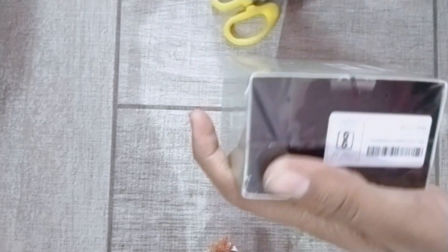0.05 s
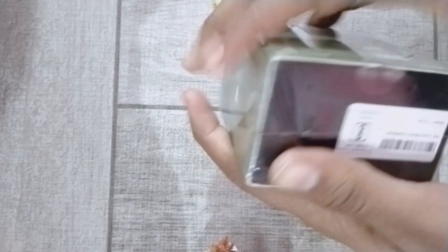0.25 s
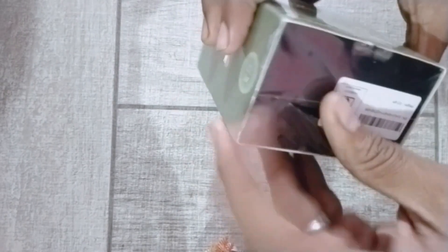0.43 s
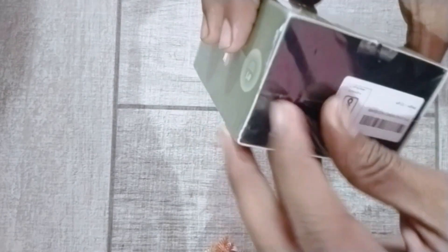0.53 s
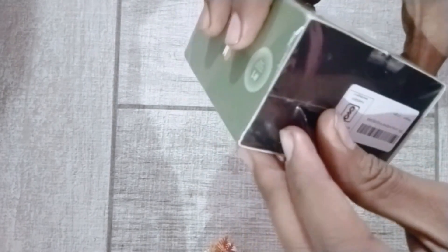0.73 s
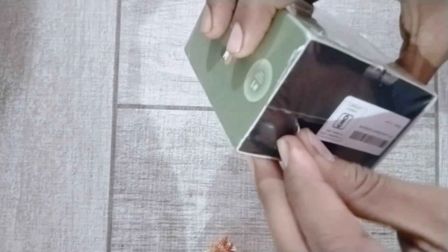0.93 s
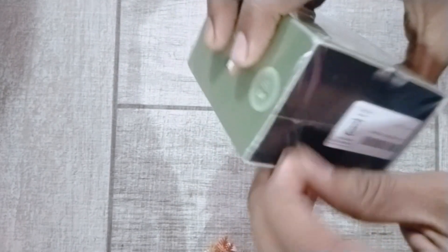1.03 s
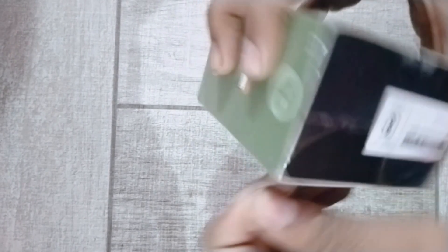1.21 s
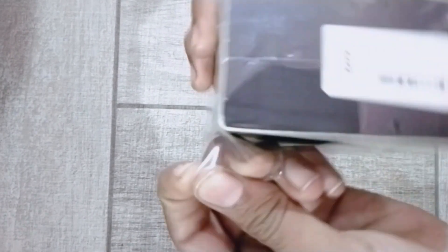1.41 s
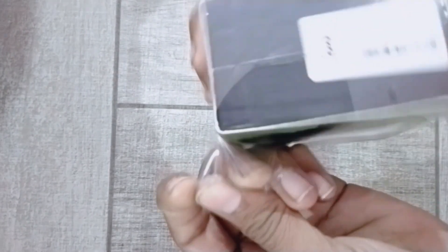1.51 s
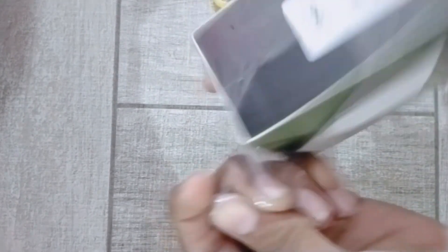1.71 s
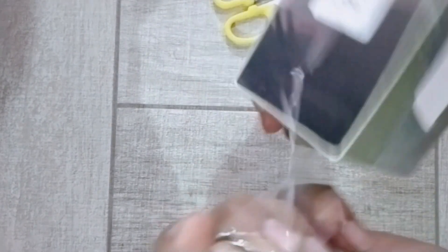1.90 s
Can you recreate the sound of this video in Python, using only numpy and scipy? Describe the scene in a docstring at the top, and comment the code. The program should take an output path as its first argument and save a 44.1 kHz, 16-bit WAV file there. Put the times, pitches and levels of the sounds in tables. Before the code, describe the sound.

Tight plastic wrap snaps and rips as hands work it off a small box, close up in a slightly echoing room. Faint rubbing and a sharp cardboard knock follow, then quiet crinkles and a last snap with a thud.

```python
"""In a hard-walled room, close to the microphone, hands tear shrink wrap off a small cardboard box.
The taut film releases its tension in a few loud snaps and a tear of many tiny slips. Palms and
fingertips rub by stick-slip friction, and two knocks excite the damped modes of the box.
The loosened film rustles and buckles in crinkles as it is pulled away, then snaps once more, with a
low thud from the box. Snaps, crinkles and knocks leave a short diffuse reverberation."""
import sys
import numpy as np
from scipy import signal
from scipy.fft import rfft, irfft, next_fast_len
from scipy.io import wavfile

SR = 44100
rng = np.random.default_rng(int(sys.argv[2]) if len(sys.argv) > 2 else 0)


def generate_wav(sig):
    """Save sig (samples, or channels by samples) to the path in sys.argv[1] as 16-bit PCM at SR."""
    pcm = np.round(np.clip(np.atleast_2d(sig).T, -1, 1) * 32767).astype(np.int16)
    wavfile.write(sys.argv[1], SR, pcm)


N = 85995

# resonances of the film stretched over the box: pitch_hz, bandwidth_hz, gain_db
FILM_RESONANCES = [(1350, 30, 4.5), (2140, 170, 6), (2820, 120, 3), (3490, 200, -2.5), (4380, 230, -7)]
# spectrum of slack film: frequency_hz, level_db
SLACK_SPECTRUM = [(60, -30.5), (250, -10.5), (900, -6.5), (1550, -12), (2200, -7.5), (3200, -7.5),
                  (4200, -4), (7000, -3), (11000, -4.5), (15500, -13)]


def amp(db):
    """Amplitude ratio of a level in decibels."""
    return 10 ** (np.asarray(db) / 20)


def unit(x):
    """Normalisation to rms 1."""
    return x / np.sqrt(np.mean(x ** 2) + 1e-20)


def along(points, hz):
    """Interpolation of (frequency_hz, value) points on a logarithmic frequency axis."""
    point_hz, values = np.transpose(points)
    return np.interp(np.log(hz + 1), np.log(point_hz + 1), values)


def envelope(points):
    """Amplitude envelope through (time_s, level_db) points."""
    return amp(np.interp(np.arange(N) / SR, *np.transpose(points)))


def sides(pan_db):
    """Level difference between the channels: left exceeds right by pan_db."""
    return amp(np.array([[pan_db], [-pan_db]]) / 2)


def add(out, start_s, sound):
    """Superposition of a sound on the mix from start_s on."""
    part = out[:, int(start_s * SR):][:, :sound.shape[1]]
    part += sound[:, :part.shape[1]]


def high_pass(x, hz, order):
    """Maximally flat attenuation of the band below hz."""
    return signal.sosfilt(signal.butter(order, hz, 'highpass', fs=SR, output='sos'), x)


def coloured(pair, spectrum, tilt_db=0):
    """Spectral shaping of a noise pair to rms 1; long waves reach both channels coherently."""
    # likeness of left and right: frequency_hz, correlation
    coherence = [(100, .92), (300, .8), (600, .3), (1000, 0), (10000, 0)]
    size = pair.shape[1]
    hz = np.fft.rfftfreq(size, 1 / SR)
    octaves = np.log2(np.maximum(hz, 300) / 4000)
    gain = amp(along(spectrum, hz) + tilt_db * octaves)
    angle = np.arccos(np.clip(along(coherence, hz), -1, 1)) / 2
    mid, side = irfft(rfft(pair) * gain * [np.cos(angle), np.sin(angle)], size)
    return unit(np.array([mid + side, mid - side]))


def resonate(x, peaks):
    """Forced response of parallel resonators driven by x."""
    return sum(amp(db) * signal.lfilter(*signal.iirpeak(hz, hz / width, SR), x)
               for hz, width, db in peaks)


def ring(modes, attack_s, lag_s=0, tilt_db=0):
    """Free vibration of damped modes, reaching the left channel lag_s late; tilt_db is per octave."""
    t = np.maximum(np.arange(4096) / SR - np.array([[lag_s], [0]]), 0)
    onset = (1 - np.exp(-t / attack_s)) ** 2
    vibration = np.zeros_like(t)
    for hz, db, t60 in modes:
        gain = amp(db + tilt_db * np.log2(hz / modes[1][0]))
        vibration += gain * np.cos(2 * np.pi * hz * t) * np.exp(-np.log(1000) * t / t60)
    return onset * vibration


def reverberate(x, wet_db, t60_scale=0.89):
    """Direct sound plus a diffuse field, in which absorption removes the treble first."""
    # reverberation time before scaling: frequency_hz, t60_s
    decay_times = [(120, 0.69), (500, 0.56), (1500, 0.51), (5000, 0.39), (13000, 0.26)]
    wall_delay_s, build_s = 0.0027, 0.0034
    hz, t, noise = signal.stft(rng.standard_normal((2, SR)), SR, nperseg=256)
    decay = amp(-60 * t / t60_scale / along(decay_times, hz)[:, None])
    tail = signal.istft(noise * decay, SR, nperseg=256)[1]
    since_reflection = np.maximum(np.arange(tail.shape[1]) / SR - wall_delay_s, 0)
    tail *= 1 - np.exp(-since_reflection / build_s)
    tail = coloured(tail, [(1, 0)]) / np.sqrt(tail.shape[1])
    return x + amp(wet_db) * signal.fftconvolve(x, tail, axes=1)[:, :N]


def background():
    """Ambient noise floor, over which faint pure tones swell and fade."""
    # faint tones: centre_s, half_length_s, pitch_hz, level_db
    faint_tones = [(.01, 0.041, 2070, -83), (0.108, 0.086, 655, -76.5), (0.514, 0.13, 452, -64),
                   (0.627, 0.049, 358.7, -67), (0.706, 0.017, 331.4, -64.5), (0.745, 0.049, 863, -72.5),
                   (1.159, 0.092, 136.3, -62.5), (1.102, 0.062, 864, -74.5)]
    # spectrum of the quiet room: frequency_hz, level_db
    floor_spectrum = [(25, -12), (150, -1), (600, -6.5), (2000, -12), (5000, -22.5), (15000, -30.5)]
    t = np.arange(N) / SR
    tones = np.zeros(N)
    for centre_s, half_s, hz, db in faint_tones:
        swell = amp(db) * np.exp(-((t - centre_s) / half_s) ** 2)
        tones += swell * np.sqrt(2) * np.sin(2 * np.pi * (hz * t + rng.random()))
    return tones + amp(-78) * coloured(rng.standard_normal((2, N)), floor_spectrum)


def stick_slip(slips_per_s, scatter_db, hiss):
    """Friction as shot noise: tiny slips of random time and size over a smooth hiss."""
    occurs = rng.random(N) < slips_per_s / SR
    slips = occurs * amp(scatter_db * np.clip(rng.standard_normal(N), -2, 2))
    slip_decay = np.exp(-np.arange(256) / (.0005 * SR))
    power = np.convolve(slips ** 2, slip_decay)[:N]
    return rng.standard_normal((2, N)) * np.sqrt(power / power.mean() + hiss ** 2)


def cracks(events, spectrum):
    """Impulsive excitation: each facet of film that flips gives a noise burst and rings at its pitch."""
    attack_s, facet_q, facet_db = .0004, 4.2, 1.5
    out, t = np.zeros((2, N)), np.arange(4096) / SR
    for start_s, db, decay_s, tilt_db, pan_db, hz in events:
        shape = (1 - np.exp(-t / attack_s)) * np.exp(-t / decay_s)
        burst = coloured(rng.standard_normal((2, len(t))), spectrum, tilt_db)
        burst = unit(burst + resonate(burst, [(hz, hz / facet_q, facet_db)]))
        add(out, start_s, amp(db) * sides(pan_db) * shape / shape.max() * burst)
    return out


def taut_film():
    """A membrane under tension twangs, fractures in snaps and a running tear, and ticks on the box edge."""
    # tear running through the film: time_s, level_db
    tear_levels = [(.115, -100), (.128, -59), (.17, -62.5), (.205, -40), (.222, -31.5), (.25, -56),
                   (.32, -36.5), (.36, -59), (.43, -58), (.55, -100), (1.89, -100), (1.915, -46.5),
                   (1.95, -47.5)]
    # spectrum of the tear: frequency_hz, level_db
    tear_spectrum = [(60, -25.5), (250, -6.5), (700, 0.5), (1300, 1), (2300, -0.5), (4500, -0.5),
                     (7000, -5.5), (11000, -12.5), (15500, -20)]
    # film giving way: start_s, level_db, decay_s, tilt_db_per_octave, pan_db, pitch_hz
    snaps = [(.1238, -46, 0.0064, -2.5, -2, 5470), (.1964, -34.5, 0.0043, -1, 5, 4300),
             (.2079, -19.5, 0.0086, 5.5, -2, 6500), (.2118, -12.5, 0.0048, -0.33, -1.5, 2760),
             (.2694, -23, 0.0065, -0.24, -1.5, 5500), (.3052, -33, 0.0043, -2, 2, 4150),
             (1.9102, -37.5, 0.0026, 1.5, -9.5, 9000), (1.9355, -34, 0.00095, -2, -4.5, 4940)]
    # spectrum of taut film: frequency_hz, level_db
    snap_spectrum = [(30, -22.5), (100, -20.5), (250, 3.5), (600, -6.5), (1000, 1.5), (3000, -2.5),
                     (4500, -3), (7000, -3.5), (11000, -4), (15500, -18)]
    # modes of the film as it is first pulled tight: pitch_hz, level_db, t60_s
    twang_modes = [(904, -2.5, 0.23), (2100, 6.5, 0.043), (2434, -0.5, .07), (3080, -3, .13)]
    # film catching on the box edge: start_s, level_db, pitch_hz
    ticks = [(1.377, -47.5, 2000), (1.4078, -45.5, 2070), (1.56, -45.5, 2115), (1.7741, -52, 1505),
             (1.7965, -39, 1790), (1.8398, -46.5, 1795), (1.9096, -28.5, 3240)]
    # modes of the film over that edge: pitch_hz, level_db, t60_s
    edge_modes = [(1293, -4, 0.025), (2197, 1.5, 0.018), (2670, 0.5, 0.015), (3650, -1, 0.017),
                  (4490, 0.5, 0.013)]
    attack_s, fall_db_per_octave = 0.0007, 17.5
    slips = stick_slip(slips_per_s=900, scatter_db=4, hiss=.8)
    tear = envelope(tear_levels) * coloured(slips, tear_spectrum)
    out = cracks(snaps, snap_spectrum) + tear + amp(-6) * resonate(tear, FILM_RESONANCES)
    add(out, start_s=.124, sound=amp(-52) * ring(twang_modes, attack_s))
    for start_s, db, catch_hz in ticks:
        # modes further from the pitch of the catch ring less
        modes = [(hz, mode_db - fall_db_per_octave * abs(np.log2(hz / catch_hz)), t60)
                 for hz, mode_db, t60 in edge_modes]
        add(out, start_s, amp(db) * ring(modes, attack_s))
    return reverberate(out, wet_db=-9.5)


def hands():
    """Palms and fingertips make friction noise; soft impacts excite the low modes of the held box."""
    # palms shifting on the box: time_s, level_db
    palm_levels = [(.11, -95), (.13, -62), (.17, -62), (.21, -47), (.26, -51), (.32, -47), (.41, -62),
                   (.46, -57), (.55, -71), (.8, -86), (1.02, -74), (1.19, -78), (1.22, -63), (1.38, -63),
                   (1.47, -76), (1.56, -73), (1.88, -80), (1.93, -70)]
    # spectrum of the palms: frequency_hz, level_db
    palm_spectrum = [(25, -21), (70, -25), (100, -8), (135, 2.5), (200, 1.5), (300, -6), (500, -29),
                     (1200, -34.5)]
    # dull bumps of the box in the hand: start_s, level_db, tilt_db_per_octave
    bumps = [(.186, -32.5, 7.5), (0.2109, -21.5, 4), (0.456, -44, -2.5), (.83, -55, 5), (1.2034, -43, 0.5),
             (1.334, -52, 11), (1.372, -46.5, -3), (1.505, -51, 5), (1.56, -54.5, -15), (1.67, -57, 15),
             (1.75, -50.5, 1), (1.798, -61.5, -15), (1.912, -43, -2)]
    # modes of the held box: pitch_hz, level_db, t60_s
    held_modes = [(172, -5.5, 0.06), (284, -3, 0.045), (318, -1.5, 0.042), (600, -13.5, .03)]
    # fingertips sliding on the wrap: time_s, level_db
    finger_levels = [(.1, -105), (.25, -66.5), (.47, -53.5), (.56, -64.5), (.66, -66), (.72, -65.5),
                     (.79, -87), (.85, -100)]
    # spectrum of the fingertips: frequency_hz, level_db
    finger_spectrum = [(100, -34), (300, -11.5), (470, 0.5), (700, -7), (1000, -6.5), (1500, -8),
                       (3000, -33)]
    skin = dict(slips_per_s=300, scatter_db=2, hiss=1)
    out = envelope(palm_levels) * coloured(stick_slip(**skin), palm_spectrum)
    for start_s, db, tilt_db in bumps:
        add(out, start_s, amp(db) * ring(held_modes, attack_s=0.0032, tilt_db=tilt_db))
    return out + envelope(finger_levels) * coloured(stick_slip(**skin), finger_spectrum)


def loose_film():
    """Buckling crinkles stand out of a fine rustle; both force the film still on the box to resonate."""
    # rustle of the pulled film: time_s, level_db
    rustle_levels = [(.435, -110), (.48, -49.5), (.53, -73), (.63, -71), (.72, -104), (.935, -100),
                     (.952, -57.5), (1.1, -101), (1.19, -78.5), (1.21, -57.5), (1.28, -56), (1.36, -59),
                     (1.42, -55), (1.46, -75.5), (1.53, -63), (1.575, -63.5), (1.63, -74), (1.71, -63),
                     (1.77, -59.5), (1.82, -74), (1.88, -88)]
    # facets buckling: start_s, level_db, decay_s, tilt_db_per_octave, pan_db, pitch_hz
    crinkles = [(.4935, -45, 0.003, -0.5, 4, 8500), (.505, -39.5, 0.002, 12, -6, 9000),
                (.5095, -43.5, 0.0031, -3.5, -1, 1790), (.6375, -55.5, 0.0025, -5.5, -6.5, 3017),
                (1.1755, -62, 0.0011, 13, -5, 8100), (1.2012, -49, 0.0032, 0.5, -6.5, 8300),
                (1.226, -50.5, 0.0052, 0, 5.5, 7980), (1.2408, -51.5, 0.0028, -2.5, -3, 7900),
                (1.2594, -46.5, 0.0047, 0, 7, 7200), (1.264, -51.5, 0.0049, -1, -12, 2850),
                (1.2865, -56, 0.0043, 5, 11, 11500), (1.2902, -42.5, 0.005, 5, 3, 4400),
                (1.3192, -53, 0.0024, 3, 10, 8750), (1.3324, -53, 0.0022, 7, -1, 8750),
                (1.3416, -44.5, .003, 5, 3, 8700), (1.4075, -49, 0.0023, 1.7, 11, 4500),
                (1.4305, -51, .003, -2.5, -9, 7220), (1.4632, -50.5, 0.0027, 1, -5.5, 5370),
                (1.551, -43, 0.009, 5.5, -5.5, 10040), (1.5603, -50.5, 0.0023, -2.5, 2, 6000),
                (1.693, -54.5, 0.0016, 0, -11, 7200), (1.761, -50, 0.0028, -2, 1, 5250),
                (1.7738, -59, .002, 1.5, -14, 8830)]
    slips = stick_slip(slips_per_s=520, scatter_db=4.6, hiss=.55)
    rustle = envelope(rustle_levels) * sides(pan_db=-1.5) * coloured(slips, SLACK_SPECTRUM)
    film = cracks(crinkles, SLACK_SPECTRUM) + rustle
    return reverberate(film + resonate(film, FILM_RESONANCES), wet_db=-7.5)


def box():
    """Impulses excite heavily damped cardboard modes and slap the film against the box."""
    # two finger knocks, then the final snap's thud: start_s, level_db, tilt_db_per_octave, relative_slap_db
    impulses = [(0.8243, -42, -5.5, -37), (0.9418, -21.5, 0, -20.5), (1.9356, -39, 0, -24)]
    # modes of the cardboard box: pitch_hz, level_db, t60_s
    box_modes = [(387, -13, 0.02), (663, 4, 0.015), (835, 5, 0.014), (943, 6, 0.013), (1652, -2, 0.018),
                 (2475, -13.5, 0.02), (3190, -8, 0.011)]
    out, t = np.zeros((2, N)), np.arange(4096) / SR
    slap_decay = np.exp(-t / 0.0029)
    for start_s, db, tilt_db, slap_db in impulses:
        body = ring(box_modes, attack_s=0.00048, lag_s=0.00031, tilt_db=tilt_db)
        slap = amp(slap_db) * slap_decay * coloured(rng.standard_normal((2, len(t))), SLACK_SPECTRUM)
        add(out, start_s, amp(db) * sides(pan_db=-4.5) * (body + slap))
    return reverberate(high_pass(out, hz=362, order=4), wet_db=-11.5, t60_scale=0.53)


def scene():
    """Superposition of film, box and hands on the quiet room."""
    return taut_film() + loose_film() + box() + hands() + background()


def record(dry):
    """Soft saturation rounds the highest peaks; band limiting thins the deep bass and cuts the top."""
    ceiling, low_cut_hz, top_hz = .62, 60, 15900
    size = next_fast_len(N + SR // 2)
    rounded = dry / (1 + (dry / ceiling) ** 6) ** (1 / 6)
    thinned = high_pass(rounded, low_cut_hz, order=2)
    low_pass = 1 / np.sqrt(1 + (np.fft.rfftfreq(size, 1 / SR) / top_hz) ** 160)
    return irfft(rfft(thinned, size) * low_pass, size)[:, :N]


dry = scene()
out = record(dry)
generate_wav(out)
```